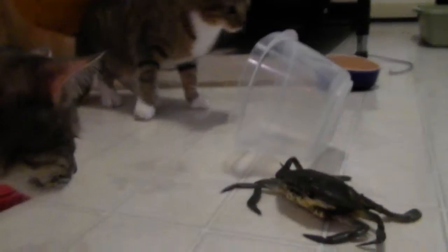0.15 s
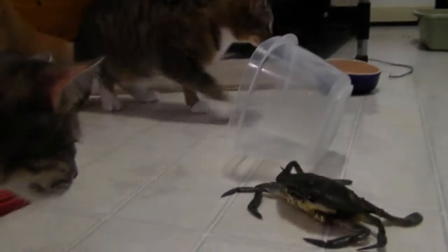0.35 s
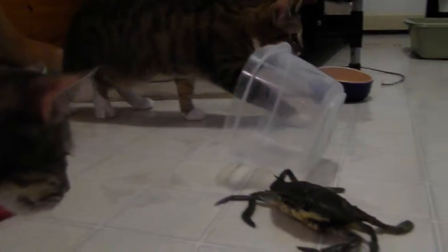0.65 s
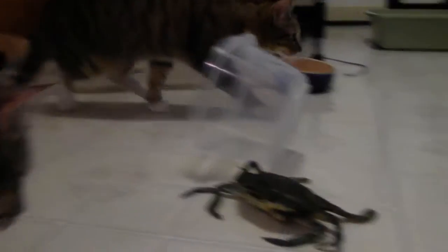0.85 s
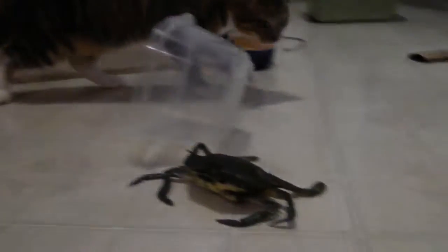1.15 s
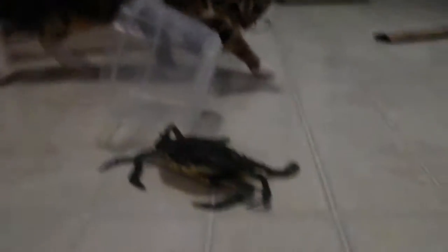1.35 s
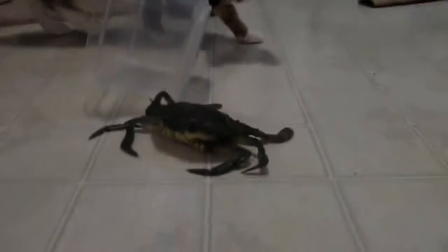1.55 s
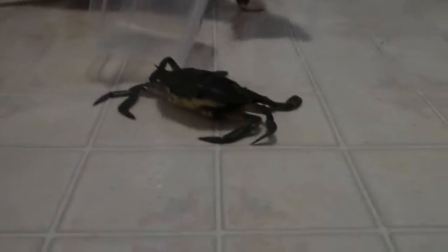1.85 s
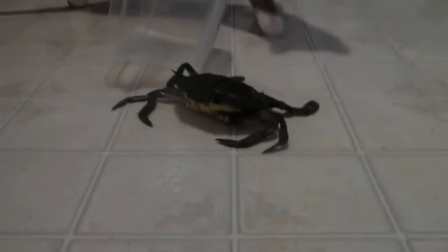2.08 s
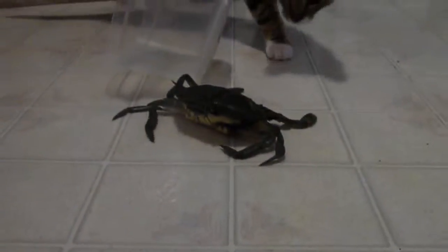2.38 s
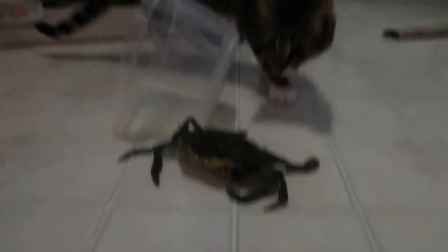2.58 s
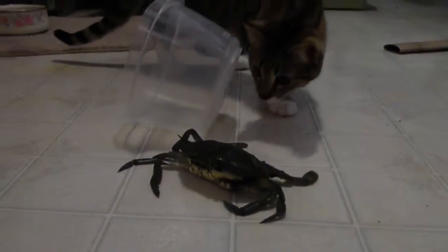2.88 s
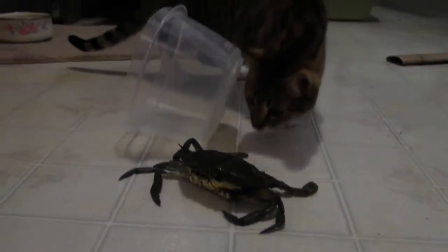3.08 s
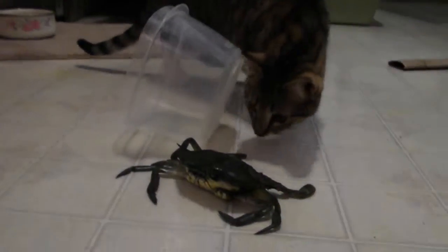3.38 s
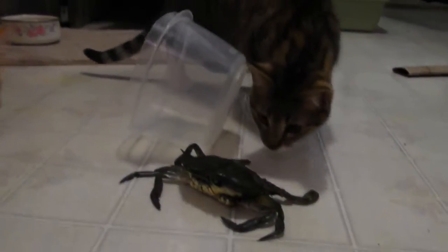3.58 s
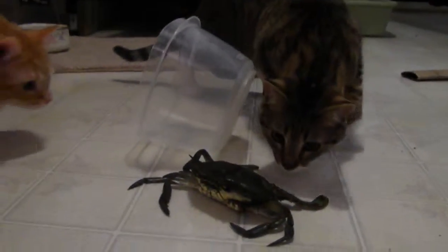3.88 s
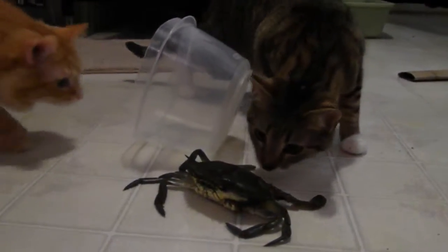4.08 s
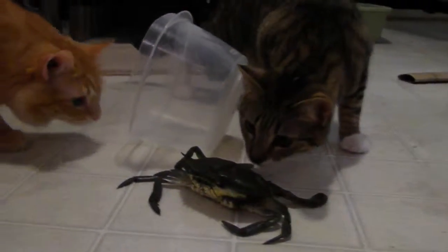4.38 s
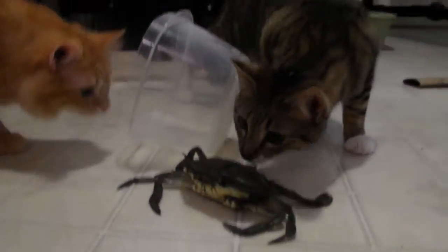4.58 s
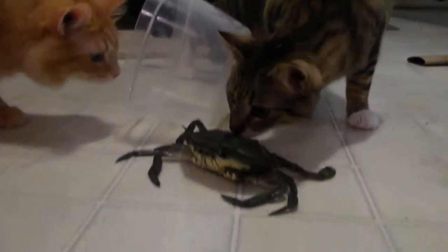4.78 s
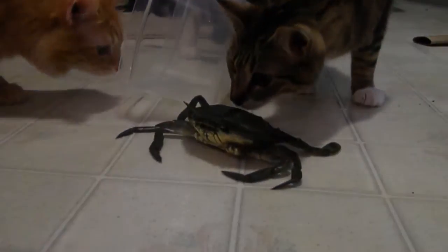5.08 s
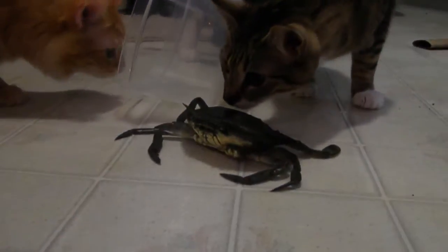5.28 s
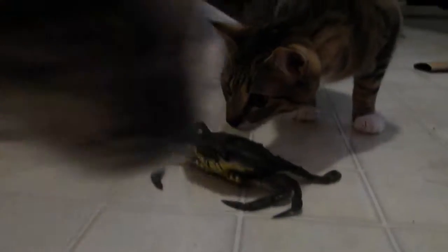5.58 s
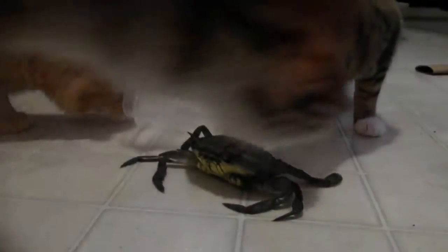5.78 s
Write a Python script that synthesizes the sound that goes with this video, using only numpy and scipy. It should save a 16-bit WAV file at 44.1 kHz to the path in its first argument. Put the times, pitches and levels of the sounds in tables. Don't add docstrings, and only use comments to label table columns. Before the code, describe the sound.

A quiet indoor kitchen with soft low room hush and a very faint fridge hum, heard through a muffled handheld camera microphone. From 0 s there are quick hissing rubs and a crisp tap; a short rough creak of the grip runs from about 0.37 to 0.52 s. The hardest knock lands near 0.64 s, followed by rubbing, an airy puff and hollow plastic bumps around 0.8 s. Bright scrapes and another knock cluster at 1.0-1.1 s, heavy soft thumps and clicks at 1.2-1.3 s, then handling fades by about 2.2 s. From 2.3 to 3.9 s, small claws tick, scuff and drag on hard tile, with a busier patter at 3.5-3.8 s. Around 4.2-4.5 s come a plastic bump, light scrapes and a thin hiss. Faint narrow sniffs, notably at 4.7 and 5.05 s, and sparse tiny ticks remain until nearly 6 s.

```python
import sys
import numpy as np
from scipy import signal
from scipy.fft import rfft, irfft, next_fast_len
from scipy.io import wavfile
from scipy.ndimage import uniform_filter1d, map_coordinates

SR = 44100
rng = np.random.default_rng(int(sys.argv[2]) if len(sys.argv) > 2 else 0)


def level_to_linear(level):
    exponent = np.asarray(level, float) / 20
    return 10 ** exponent


def waveform_to_disk(signal):
    frames = np.transpose(np.atleast_2d(signal))
    scaled = np.clip(frames, -1, 1) * 32767
    samples = np.round(scaled).astype(np.int16)
    wavfile.write(sys.argv[1], SR, samples)


N = 261933


def unit(x):
    return x / np.sqrt(np.mean(x ** 2, axis=-1, keepdims=True) + 1e-20)


def along(points, hz):
    f, db = np.transpose(points)
    return level_to_linear(np.interp(np.log(hz + 1), np.log(f + 1), db, left=-120, right=-120))


def curves(rows):
    s, *cols = np.transpose(rows)
    return [np.interp(np.arange(N) / SR, s, c) for c in cols]


def wobble(rate):
    knots = rng.standard_normal(int(N * rate / SR) + 4)
    return map_coordinates(knots, [np.arange(N) * rate / SR])


def filtered(x, response):
    m = next_fast_len(x.shape[-1] + 4096)
    spectrum = rfft(x, m) * response(np.fft.rfftfreq(m, 1 / SR))
    return irfft(spectrum, m)[..., :x.shape[-1]]


def mode(f, hz, width_hz):
    return 1j * f * width_hz / (hz * hz - f * f + 1j * f * width_hz)


def rush(spectrum, patchy_db):
    z = signal.stft(rng.standard_normal(N + 512), nperseg=256)[2]
    field = uniform_filter1d(rng.standard_normal(z.shape), size=5, axis=0)
    field = uniform_filter1d(field, size=9, axis=1)
    x = signal.istft(z * level_to_linear(patchy_db * field / field.std()), nperseg=256)[1][:N]
    return unit(filtered(x, lambda hz: along(spectrum, hz)))


def add(track, s, sound):
    part = track[max(round(s * SR), 0):][:len(sound)]
    part += sound[:len(part)]


# (frequency [Hz], level [dB])
HUSH_SPECTRUM = [(24, -63.5), (40, -12.5), (91, -19), (108, -7.5), (201, 0), (262, -0.5), (390, -15.5),
                 (426, -0.5), (988, -7), (2390, -9), (3050, -10.5), (5190, -20), (7900, -31), (10300, -62),
                 (17400, -120)]
# (frequency [Hz], rms level [dB])
FRIDGE_HUM = [(120, -71)]


def room():
    t = np.arange(N) / SR
    hum = np.zeros(N)
    for hz, db in FRIDGE_HUM:
        hum += np.sqrt(2) * level_to_linear(db + 1.0 * wobble(3.0)) * np.sin(2 * np.pi * hz * t)
    return level_to_linear(-59.5) * rush(HUSH_SPECTRUM, patchy_db=2.0) + hum


def efforts(rows, rise, calm_db):
    t, (s, held_ms, db, fade) = np.arange(N) / SR, np.transpose(rows)[..., None]
    rising = rise * np.maximum(s - t, 0)
    fading = fade * np.maximum(t - s - held_ms / 1000, 0)
    return np.maximum((db - rising - fading).max(axis=0), calm_db)


# (full speed at [s], held [ms], hiss level [dB], fade [dB/s])
STROKES = [(0, 31, -43, 303), (.1, 18, -45, 139), (.285, 43, -50, 203), (.585, 50, -47, 98),
           (.655, 45, -38.5, 49), (.705, 12, -33, 152), (.765, 100, -34, 400), (.875, 60, -39, 32),
           (.94, 58, -37, 901), (1, 30, -41, 50), (1.055, 30, -37, 150), (1.105, 105, -37.5, 78),
           (1.355, 150, -40, 98), (1.47, 85, -43.5, 121), (1.63, 60, -51, 32), (1.705, 21, -44.5, 198),
           (1.74, 100, -49, 30), (1.845, 151, -46, 121), (2.08, 3, -55.5, 19)]
# (full weight at [s], held [ms], rumble level [dB])
LEANS = [(0, 2.8, -52), (.1, 130, -53.5), (.27, 250, -55.5), (.6, 900, -54), (.67, 2.8, -47),
         (0.802, 3.3, -46), (1, 2.7, -49.5), (1.12, 61, -47.5), (1.19, 3.5, -45.5), (1.27, 3, -61.5),
         (1.37, 440, -54.5), (1.57, 14, -49.5), (1.88, 40, -50.5), (1.98, 3, -48.5), (2.2, 1200, -56.5),
         (4.05, 460, -58), (5.3, 320, -57.5)]
# (frequency [Hz], level [dB])
RUMBLE_SPECTRUM = [(24, -74), (40, -11), (174, -2), (308, -1), (371, 0.5), (546, -10), (650, -9.5),
                   (840, -12.5), (1430, -120)]
DRAG_SPECTRUM = [(450, -17), (650, -3.5), (1300, -3), (1700, -9), (2400, -35)]
HISS_SPECTRUM = [(1060, -36.5), (1800, -12), (2280, -5.5), (2560, -13.5), (2920, -8), (3360, -9),
                 (4640, -2.5), (5380, -5.5), (6730, -7), (7380, -9.5), (7900, -5.5), (10300, -47),
                 (17400, -120)]


def rubbing():
    hiss_db = efforts(STROKES, rise=450, calm_db=-59)
    lean_fade = 120
    rumble_db = efforts([(*row, lean_fade) for row in LEANS], rise=85, calm_db=-59)
    speed_share = 0.47
    drag_db = -1.5 + speed_share * hiss_db + (1 - speed_share) * rumble_db
    busy = np.clip((hiss_db + 66) / 18, .25, 1)
    pressure = busy * wobble(20)
    rumble_gain = level_to_linear(rumble_db - 0.5 + 1.4 * pressure + 2.6 * busy * wobble(60))
    drag_gain = level_to_linear(drag_db - 2.5 + 1.6 * pressure + 2.1 * busy * wobble(80))
    hiss_gain = level_to_linear(hiss_db - 0.7 + .9 * pressure + 1.4 * busy * wobble(220))
    rumble = rumble_gain * rush(RUMBLE_SPECTRUM, patchy_db=2.5)
    drag = drag_gain * rush(DRAG_SPECTRUM, patchy_db=2.0)
    hiss = hiss_gain * rush(HISS_SPECTRUM, patchy_db=2.0)
    snags = (rng.random(N) < 400 / SR) * rng.standard_normal(N) * rng.random(N)
    crackle = level_to_linear(hiss_db - 6.5) * busy * unit(filtered(snags, lambda f: mode(f, 5200, 3800)))
    return rumble + drag + hiss + crackle


# (time [s], slip rate [1/s], level [dB])
CREAK = [
    (.35, 100, -70),
    (.375, 106, -44.5),
    (.424, 146, -41),
    (.43, 98, -40.5),
    (.452, 100, -40.5),
    (.462, 124, -41),
    (.488, 128, -40.5),
    (.508, 156, -43),
    (.525, 150, -70),
]


def creak():
    rate, db = curves(CREAK)
    loaded = np.arange(N) > .3695 * SR
    slips = np.diff(np.floor(np.cumsum(rate * loaded) / SR), prepend=0)
    slips = slips * level_to_linear(db + 31.5 + 1.4 * rng.standard_normal(N)) * (db > -69)

    def plastic(f):
        soft = 1 / (1 + (f / 1350) ** 4)
        return soft * (1.25 * mode(f, 375, 110) + .95 * mode(f, 900, 800))
    return filtered(slips, plastic)


# (time [s],
# peak level [dB])
PUSHES = [(0.5851, -42), (0.6567, -31.5), (0.7449, -38), (0.7867, -31), (0.885, -38), (0.909, -38.5),
          (1.201, -32), (1.2124, -18), (1.223, -32), (1.2612, -18), (1.284, -22), (1.2983, -21.5),
          (1.3175, -26.5), (1.6274, -35.5), (1.6621, -43),
          (1.804, -33), (1.844, -36.5), (1.8524, -36), (1.877, -43.5), (1.919, -33), (1.9307, -34.5),
            (2.0382, -43), (2.1089, -40), (2.1308, -38), (2.1495, -43), (2.161, -41), (2.172, -47),
            (2.2112, -41.5), (2.232, -36), (2.6246, -44.5), (3.037, -43), (3.11, -45.5), (3.1516, -41.5),
            (3.1722, -39), (3.188, -40), (3.2118, -41.5), (3.2276, -41), (3.2423, -41.5), (3.447, -45),
            (3.528, -42)]
# (time [s], peak level [dB])
RELEASES = [(0.622, -38.5), (0.802, -37), (0.8216, -21.5), (0.8717, -37), (0.9403, -32), (0.981, -25),
            (1.0326, -22), (1.0892, -27.5), (1.36, -36.5), (1.4, -41), (1.4326, -31.5), (1.4531, -45),
            (1.819, -34.5), (1.86, -43), (1.9438, -38)]


def thumps():
    out = np.zeros(N)
    jolts = [(*row, -1) for row in PUSHES] + [(*row, 1) for row in RELEASES]
    for s, db, direction in jolts:
        pace = 1 + np.clip((-db - 22) / 90, 0, .22) * rng.uniform(-1, 1)
        ms = pace * np.arange(-200, 900) * 1000 / SR
        after = np.maximum(ms - .4, 0)
        swing = np.sin(2 * np.pi * .155 * after) * np.exp(-after / 3.8)
        load_up = np.exp(-((ms + 1.1) / .55) ** 2)
        push = np.exp(-(ms / .46) ** 2) - .5 * load_up - .68 * swing
        add(out, s - 200 / SR, direction * level_to_linear(db + 2.5) * push)


    return out


# (time [s], peak level [dB], push [ms])
KNOCKS = [
    (.638, -16, .04),
    (.6447, -2.4, .085),
    (.8206, -17, .04),
    (1.0315, -17, .07),
    (1.2122, -24, .04),
    (1.6207, -30, .04),
    (.9669, -23, .04),
    (2.5597, -35, .05),
]


def knocks():
    out, ms = np.zeros(N), np.arange(-200, 900) * 1000 / SR
    recoil, sway = np.clip(ms - .25, 0, 1.9), np.maximum(ms - 1.9, 0)
    case = .09 * np.sin(2 * np.pi * .135 * sway) * np.exp(-sway / 7)
    case -= .3 * np.sin(np.pi * recoil / 1.9) ** .6
    for s, db, push_ms in KNOCKS:
        t = np.maximum(ms, 0) / push_ms
        snap = np.e * t * np.exp(-t) - .25 * np.exp(-((ms + push_ms) / .06) ** 2)
        moved = np.clip((push_ms - .04) / .045, 0, 1.5)
        add(out, s + ms[0] / 1000, level_to_linear(db) * (snap + moved * case))
    return out


def resonant_puffs(rows, rise_ms, fade, side_db, strike_db):
    out, ms = np.zeros(N), np.arange(SR // 4) * 1000 / SR
    for s, db, length_ms, hz, width_hz in rows:
        def cavity(f):
            main = mode(f, hz, width_hz) * mode(f, hz, 1.5 * width_hz)
            below = mode(f, 0.516 * hz, 0.29 * width_hz) ** 2
            above = mode(f, 1.48 * hz, 0.35 * width_hz) ** 2
            return main + level_to_linear(side_db) * (below + above)
        envelope = (1 - np.exp(-ms / rise_ms)) * np.exp(-(ms / length_ms) ** fade)
        force = rng.standard_normal(len(ms)) * envelope
        force *= level_to_linear(3.2 * unit(uniform_filter1d(rng.standard_normal(len(ms)), size=130)))
        force[0] -= level_to_linear(strike_db)
        sound = filtered(force, cavity)
        size = level_to_linear(db + 1.0) * np.sqrt(length_ms * SR / 1000)
        add(out, s, size * sound / np.linalg.norm(sound))
    return out


# (time [s], level [dB], length [ms], hollow mode [Hz], width [Hz])
TUB_BRUSHES = [(0, -50, 64, 844, 600), (1.53, -54, 110, 666, 347), (.803, -36, 8.2, 790, 400),
               (.8235, -31, 7.3, 750, 400), (1.2135, -37, 10, 700, 350), (1.262, -36, 6, 700, 350),
               (1.285, -38, 6, 700, 350), (1.299, -38, 6, 700, 350), (.1, -54, 60, 1350, 400),
               (.19, -52, 30, 850, 400), (2.374, -44, 9.2, 770, 495), (2.388, -46.5, 20, 830, 593),
               (2.378, -47, 28, 394, 200), (2.377, -51, 30, 1300, 350), (2.466, -54, 18, 1300, 350),
               (2.853, -52, 30, 1300, 400), (2.465, -48.5, 14, 446, 250), (2.48, -54, 17, 790, 500),
               (2.512, -55.5, 37, 900, 500), (2.85, -50, 39, 750, 700), (4.24, -57, 41, 1280, 300)]
# (time [s], level [dB], length [ms], hollow mode [Hz], width [Hz])
BUMPS = [
    (.8003, -29, 2.5, 1160, 700),
    (.8203, -24, 2.5, 800, 600),
    (.967, -34, 7.7, 1050, 500),
    (2.4615, -41.5, 8, 850, 600),
    (2.5385, -52, 4, 900, 500),
    (2.884, -47, 3, 900, 600),
    (2.505, -47.5, 6, 890, 500),
    (4.212, -41.5, 10.6, 1050, 446),
]


def tub():
    brushes = resonant_puffs(TUB_BRUSHES, rise_ms=1.7, fade=2.6, side_db=-9.0, strike_db=16)
    return brushes + resonant_puffs(BUMPS, rise_ms=1.0, fade=0.9, side_db=-11.0, strike_db=26.5)


# (time [s], level [dB], length [ms], whistle [Hz])
SNIFFS = [(0.791, -33.5, 62, 7100), (.83, -46, 38, 5030), (2.09, -49.5, 18, 4800), (2.649, -47, 25, 5020),
          (2.69, -65, 90, 5000), (4.209, -55.5, 74, 3770), (4.697, -49, 22, 4650), (4.765, -51.5, 33, 5220),
          (5.048, -48.5, 29, 5000), (5.08, -60.5, 84, 5030), (5.22, -61, 24, 3600), (5.39, -58, 25, 3500),
          (5.51, -60.5, 30, 4970), (5.745, -51, 4.2, 4900)]


def sniffs():
    puffs = [(*row, 0.13 * row[-1]) for row in SNIFFS]
    return resonant_puffs(puffs, rise_ms=3.2, fade=1.13, side_db=-25.0, strike_db=1.0)


# (time [s], level [dB], held [ms], first pitch [Hz], last pitch [Hz])
WHISTLES = [(0, -48.5, 30, 4340, 4200), (.085, -56, 67, 4380, 4500), (0.279, -57.5, 71.5, 4420, 4110),
            (1.46, -49, 125, 4750, 4510), (1.7, -48, 51, 4380, 4720), (1.752, -51.5, 55, 4750, 4540),
            (1.7, -52.5, 48, 1410, 1344), (1.76, -58.5, 44, 1377, 1385), (4.308, -48.5, 35, 4910, 4500),
            (5.387, -58, 31, 3520, 3600), (5.46, -64, 60, 3700, 3600), (5.55, -67, 80, 3600, 3500),
            (5.27, -68, 90, 3600, 3550), (5.87, -63, 70, 4400, 4600), (.88, -53.5, 59, 2200, 2250),
            (1.04, -45, 29, 2284, 2185)]


def whistles():
    out, ms = np.zeros(N), np.arange(SR // 5) * 1000 / SR
    spread, edge_ms = 0.075, 4.6
    for s, db, held_ms, first_hz, last_hz in WHISTLES:
        hz = first_hz + (last_hz - first_hz) * np.minimum(ms / held_ms, 1)
        noise = rng.standard_normal((2, len(ms)))
        slow = filtered(noise, lambda f: 1 / (1 + (2 * f / (spread * first_hz)) ** 2))
        turn = 2 * np.pi * np.cumsum(hz) / SR
        edges = np.minimum(ms / edge_ms, 1) * np.exp(-np.maximum(ms - held_ms, 0) / edge_ms)
        edges *= level_to_linear(2.5 * unit(uniform_filter1d(rng.standard_normal(len(ms)), size=200)))
        carried = slow[0] * np.cos(turn) + slow[1] * np.sin(turn)
        add(out, s, level_to_linear(db) * edges * unit(carried))
    return out


def contacts(rows, rise_ms, sag_db, fall_db_ms, ring_db, grit_db, strike_db):
    out, ms = np.zeros(N), np.arange(SR // 7) * 1000 / SR
    for s, db, touch_ms, knock_db, ring_hz in rows:
        noise = rng.standard_normal((3, len(ms)))
        sag = sag_db * np.minimum(ms / touch_ms, 1)
        fall = fall_db_ms * np.maximum(ms - touch_ms, 0)
        touch = (1 - np.exp(-ms / rise_ms)) * level_to_linear(-sag - fall)
        touch *= level_to_linear(grit_db * unit(uniform_filter1d(noise[2], size=40)))
        force = (noise[:2] * touch)[:, :round((touch_ms + 30) * SR / 1000)]
        force[:, 8] += level_to_linear(strike_db) * np.sign(noise[0, 0])
        ring = level_to_linear(ring_db - 0.75 * knock_db)
        glaze = filtered(force[0], lambda f: mode(f, 3000, 6000) + ring * mode(f, ring_hz, 0.18 * ring_hz))
        shell = filtered(force[1], lambda f: mode(f, 567, 450) - mode(f, 1426, 250))
        glaze = glaze / np.linalg.norm(glaze)
        shell = level_to_linear(knock_db - 4.5) * shell / np.linalg.norm(shell)
        size = level_to_linear(db) * np.sqrt(touch_ms * SR / 1000)
        add(out, s, size * (glaze + shell))
    return out


# (time [s], level [dB], stroke [ms], shell knock re level [dB], ring [Hz])
SCUFFS = [(.983, -29, 15.8, -8, 6860), (1.034, -24.5, 15, -12, 4650), (1.09, -25.5, 11.2, -10.5, 4900),
          (1.132, -37.5, 27, -16, 4600), (2.327, -47, 11, -7, 5430), (2.362, -47.5, 51, -6, 6600),
          (3.875, -54, 91, -1, 3450), (4.202, -48.5, 24, -10, 4000), (4.352, -46.5, 65, -12, 4500),
          (4.381, -51, 8, -13, 4900), (3.318, -45, 5, -5, 4000), (2.621, -50, 9, -8, 4700),
          (2.415, -58, 45, -12, 4500)]


def scuffs():
    return contacts(SCUFFS, rise_ms=3.9, sag_db=5.0, fall_db_ms=2.5, ring_db=-4.0, grit_db=2.5, strike_db=-6)


# (time [s], level [dB], stroke [ms], shell knock re level [dB], ring [Hz])
SCRAPES = [(0.639, -32, 13.5, -12, 2960), (0.652, -33, 13, -17, 6750), (1.0306, -20.5, 4, -5, 6900),
           (1.049, -34, 19, -16, 4600), (1.0879, -23.5, 4, -9.5, 4700), (1.392, -37, 47.5, -16, 4600),
           (1.623, -41.5, 13, -20, 4200), (1.8432, -44, 21, -12, 4950), (1.915, -39.5, 27, -14.5, 7040),
           (1.972, -47, 35, -14, 4500), (2.461, -51.5, 54, -1, 4700), (2.8499, -44, 38, -8, 4550),
           (3.1892, -49.5, 18, -3, 4200), (3.3049, -43.5, 14, 0.5, 4200), (4.23, -51, 110, -2, 4560),
           (4.455, -50.5, 15, -3, 4150)]


def scrapes():
    return contacts(SCRAPES, rise_ms=0.55, sag_db=5.5, fall_db_ms=1.5, ring_db=-3.5, grit_db=2.5, strike_db=1.0)


# (time [s], level [dB], contact [ms], ring [Hz])
TAPS = [(.0349, -24, 0.6, 4450), (.1913, -38.5, 3.4, 4700), (.5837, -38, 8.1, 6700),
        (.6377, -26, 5.4, 6100), (.9402, -44, 20, 4760), (.9677, -33.5, 10, 4070), (1.2601, -28, 2.5, 4320),
        (1.2845, -23.5, 1.3, 5430), (1.2969, -36.5, 12.7, 3900), (1.3167, -31, 1.3, 3100),
        (1.3905, -26.5, 1.1, 4200), (1.4547, -48, 2.3, 4200), (1.6207, -35.5, 4.5, 7240)]
# (time [s], level [dB], contact [ms], ring [Hz])
STEPS = [(2.2875, -49, 9.9, 4370), (2.3471, -44, 2.5, 4310), (2.5236, -43.5, 5.4, 2250),
         (2.5597, -41, 4.5, 2280), (2.7948, -47, 6.1, 4150), (2.8112, -37.5, 1.6, 3740),
         (2.8814, -55.5, 5, 2480), (2.9701, -41.5, 3.8, 5900), (3.0361, -43.5, 5.2, 4330),
         (3.1117, -41.5, 9.2, 4650), (3.4454, -43, 7.6, 3160), (3.5056, -43.5, 5.6, 5350),
         (3.5293, -39, 2.8, 5560), (3.5537, -43.5, 4.4, 4700), (3.5845, -47.5, 10, 4260),
         (3.6605, -42.5, 3.9, 4600), (3.6802, -46.5, 7.3, 4000), (3.7095, -47, 5.7, 4670),
         (3.739, -48.5, 7.4, 4000), (3.7696, -48.5, 4.4, 5800), (3.793, -51, 9.4, 3240),
         (3.8149, -50.5, 12, 5550), (4.2399, -48, 2.7, 3600), (5.8554, -49.5, 5.2, 2200)]
# (time [s], level [dB], contact [ms], ring [Hz])
GRAZES = [(.568, -36.5, 1.3, 6800), (1.0142, -37, 1.4, 6770), (1.2468, -31, 1.1, 5600),
          (.0545, -46, 1.5, 6500), (.085, -49, 2, 5600), (.404, -51.5, 5, 6900), (.7085, -42, 3, 4800),
          (1.18, -31, 2.5, 7140), (1.355, -48, 2.8, 4600), (1.689, -57, 3, 7300), (1.778, -53, 2.5, 7400),
          (2.485, -47, 3, 6200), (2.579, -57, 3, 4000), (2.607, -56, 3, 4500), (2.733, -54, 5, 4240),
          (2.833, -49, 4, 4800), (3.8373, -55, 5, 5640), (3.858, -55, 6, 5000), (4.0937, -58, 4, 5540),
          (4.101, -52, 3, 3700), (4.1531, -54, 3, 4900), (4.169, -55, 3, 4200), (1.651, -40, 2.9, 3700),
          (2.2493, -48, 3.3, 3700), (2.6808, -48, 2.5, 4170), (3.0566, -45, 7.8, 6700),
          (3.1652, -47.5, 2.1, 3700), (3.2349, -48.5, 15, 4360), (3.4314, -45, 7, 4300),
          (3.5483, -49, 3.3, 5000), (4.0283, -45, 1.7, 3820), (4.4546, -40.5, 1.3, 4300),
          (4.5811, -45, 3.9, 5200), (4.6449, -52, 13, 7100), (4.7761, -42, 4.3, 5230),
          (4.8117, -50, 2, 3620), (4.99, -46.5, 2.6, 3900), (5.283, -52, 2.7, 4700),
          (5.4458, -44.5, 2.8, 4000), (5.6074, -44, .9, 4900)]


def ticks():
    touches = []
    for rows, knock_db in [(TAPS, -2), (STEPS, 2), (GRAZES, -29)]:
        touches += [(s, db, ms, knock_db, hz) for s, db, ms, hz in rows]
    return contacts(touches, rise_ms=0.095, sag_db=12.5, fall_db_ms=3.5, ring_db=4.5, grit_db=3.0, strike_db=10.0)


def scene():
    background = room() + rubbing()
    camera = creak() + thumps() + knocks() + tub()
    noses = sniffs() + whistles()
    claws = scuffs() + scrapes() + ticks()
    return (background + camera + noses + claws)[None]


def low_pass(x):
    return signal.sosfilt(signal.butter(12, 8690, fs=SR, output="sos"), x)


# (frequency [Hz], gain [dB])
EDGE = [(30, -17.5), (60, -6), (110, -2), (7400, -2.5), (7750, -13), (7880, -18), (7995, -38)]
# (frequency [Hz], gain [dB])
MIRROR = [(8005, -50), (8110, -31), (8260, -27), (8500, -40), (8690, -58.5)]


def record(dry):
    capture_hz = 16000
    heard = filtered(dry, lambda hz: along(EDGE, hz))
    flipped = 2 * dry * np.cos(2 * np.pi * capture_hz * np.arange(N) / SR)
    image = filtered(flipped, lambda hz: along(MIRROR, hz))
    return low_pass(heard + image)


dry = scene()
out = record(dry)
waveform_to_disk(out)
```